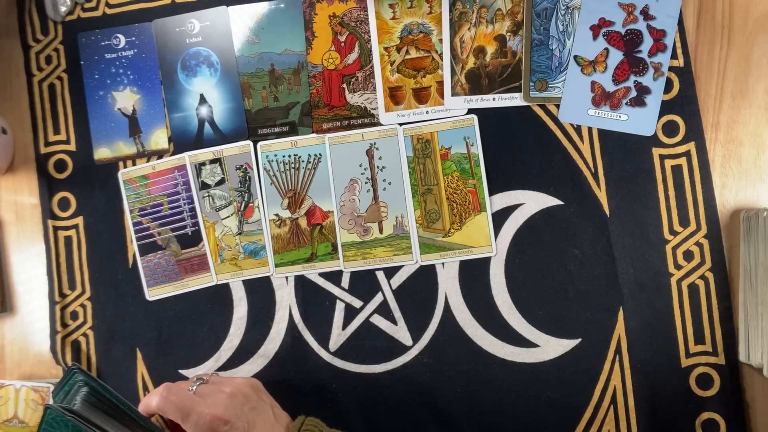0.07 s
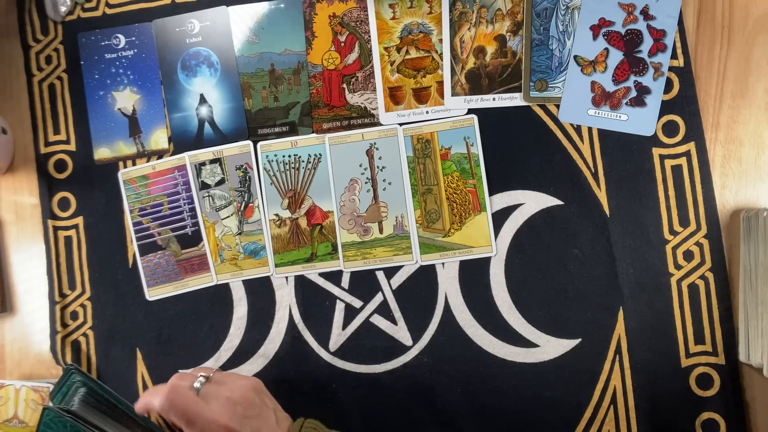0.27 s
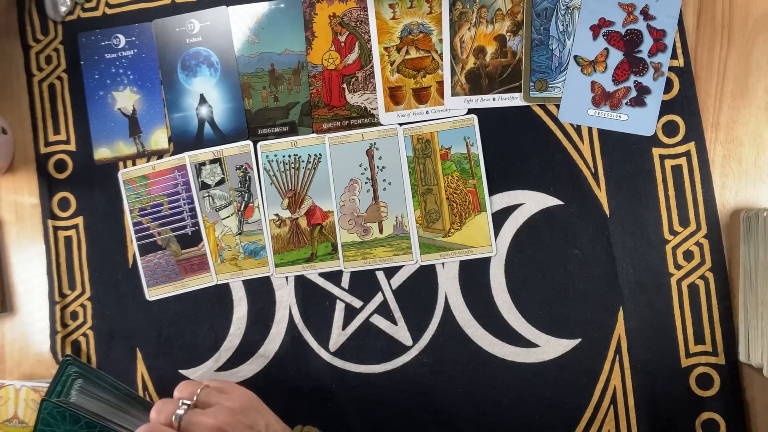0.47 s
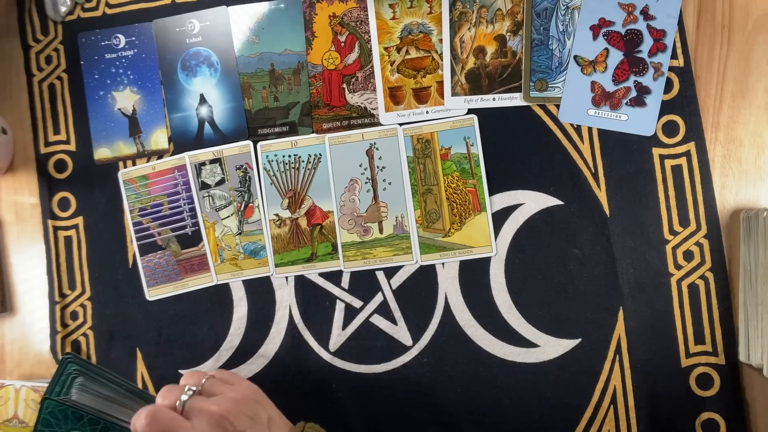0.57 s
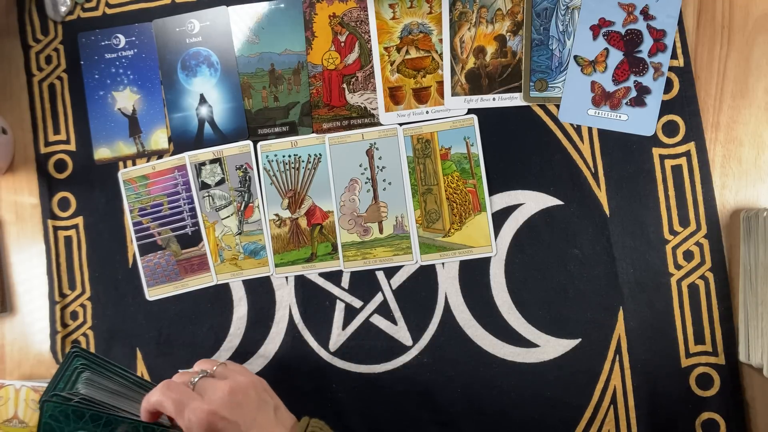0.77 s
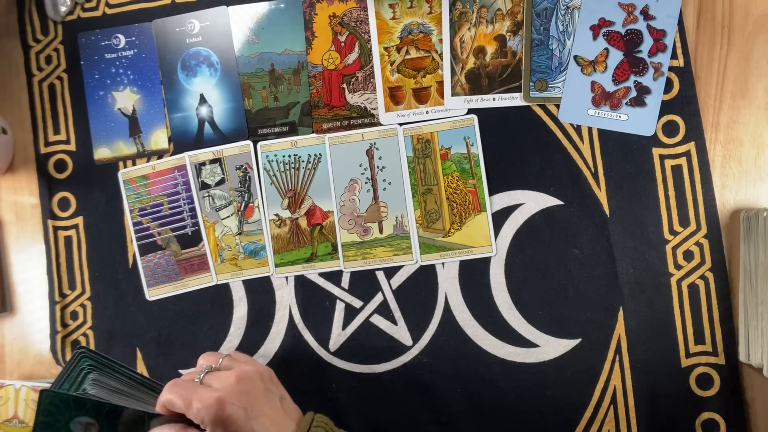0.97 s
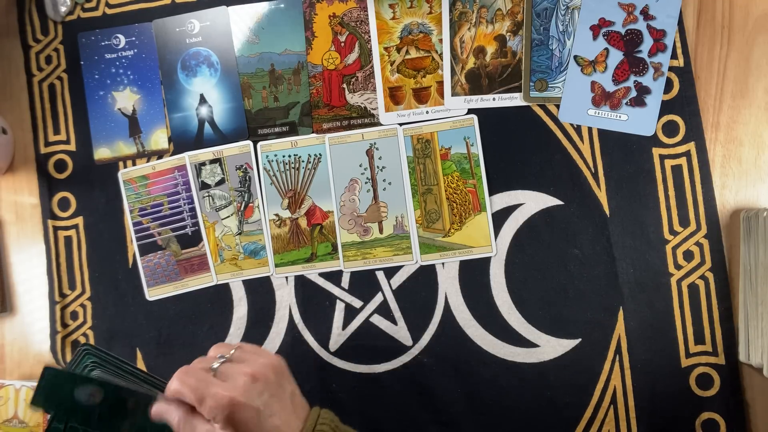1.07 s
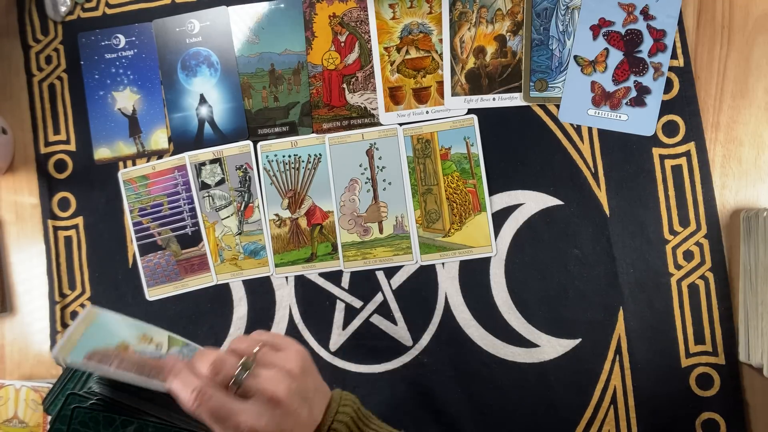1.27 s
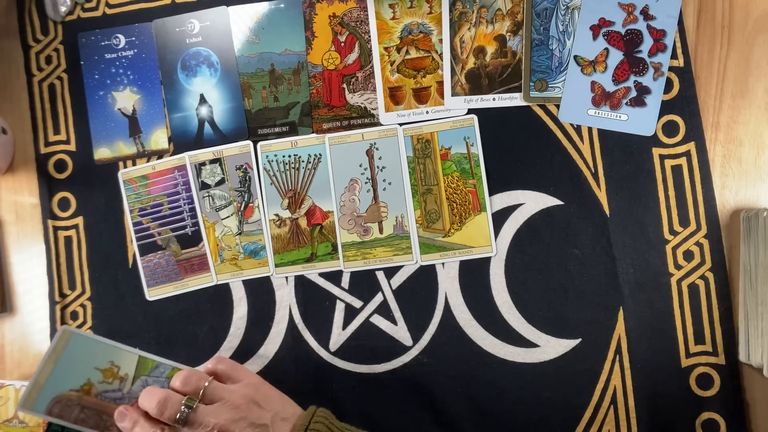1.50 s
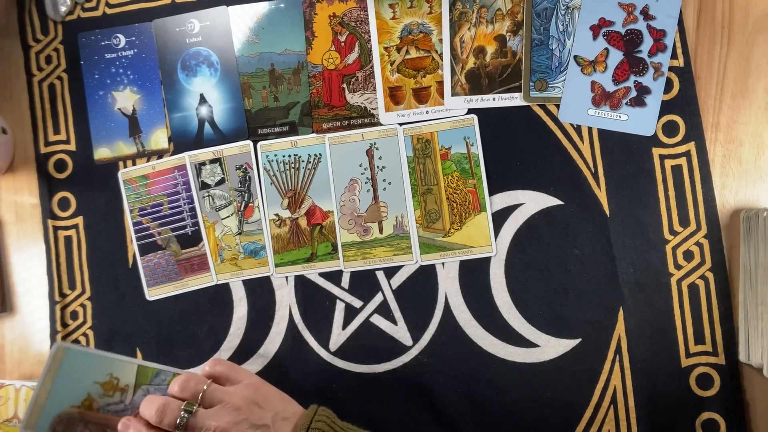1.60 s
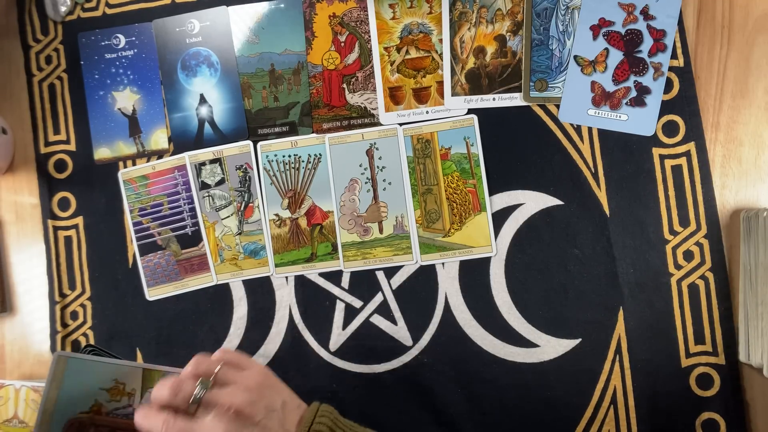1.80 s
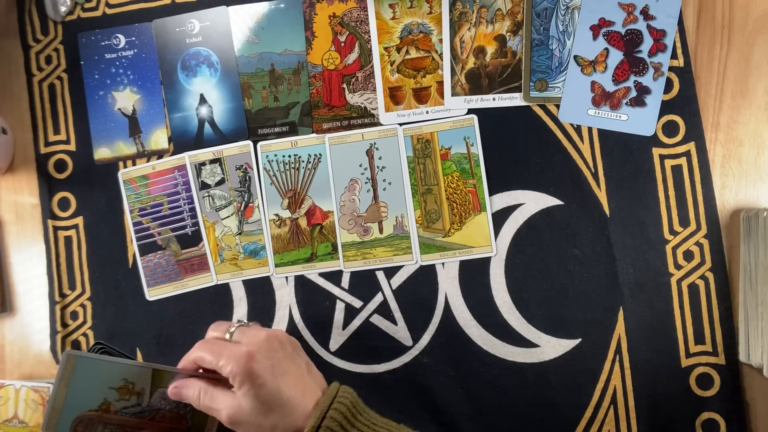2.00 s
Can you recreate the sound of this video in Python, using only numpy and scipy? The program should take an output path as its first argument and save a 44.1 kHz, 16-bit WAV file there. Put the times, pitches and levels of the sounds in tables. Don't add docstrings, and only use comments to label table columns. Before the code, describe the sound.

A card slides softly from a deck and snaps free with one loud, crisp crack, followed by two much quieter clicks. Faint handling rustle and sleeve rubbing continue in a small room, captured fairly close.

```python
import sys
import numpy as np
from scipy import signal
from scipy.io import wavfile
from scipy.ndimage import uniform_filter1d

SR = 44100
rng = np.random.default_rng(int(sys.argv[2]) if len(sys.argv) > 2 else 0)


def gain_from_decibels(decibels):
    exponent = np.asarray(decibels, float) / 20
    return 10 ** exponent


def unload_wav(signal):
    wavfile.write(
        sys.argv[1],
        SR,
        np.round(np.clip(np.atleast_2d(signal).T, -1, 1) * 32767).astype(np.int16),
    )


N = 90316


def unit(x):
    return x / np.sqrt(np.mean(x ** 2))


def band(x, hz, width):
    return signal.lfilter(*signal.iirpeak(min(hz, .45 * SR), hz / width, fs=SR), x)


def ring(hz, t60, size=6000):
    t = np.arange(size) / SR
    return np.sin(2 * np.pi * hz * t) * np.exp(-np.log(1000) * t / t60)


def walk(rate):
    k = int(SR / rate)
    steps = np.repeat(rng.standard_normal(N // k + 1), k)
    return 3.14 * uniform_filter1d(uniform_filter1d(steps, k), k)[:N]


def contacts(rows, way, deck_db, tick_cycles, crack_db):
    # pitch in Hz, level in dB, fade time (t60) in seconds.
    deck_modes = [(270, -12, .05), (390, -10, .06), (550, -9, .07), (730, -12, .05), (883, -8, .09),
                  (1170, -17, .07), (1430, -12, .04), (1590, -13, .05), (1735, -13, .06), (1895, -16, .035),
                  (3000, -10, .025), (3950, -10, .025), (4130, -9, .03), (6700, -10, .008)]
    size = 6000
    flex_cycles, onset_cycles = 12.4, 0.18
    reach_oct, edge_deck_db = 0.45, -15
    crack_s = .004
    t = np.arange(size) / SR
    out = np.zeros(N + size)

    def deck(near_hz, uneven):
        total = 0
        for (hz, db, t60), g in zip(deck_modes, uneven):
            nearness = np.exp(-(np.log2(hz / near_hz) / reach_oct) ** 2)
            total = total + gain_from_decibels(db + 2 * g) * ring(hz, t60) * nearness
        return total

    for s, flex_db, flex_hz, tick_db, tick_hz in rows:
        uneven = rng.standard_normal(len(deck_modes))
        onset = 1 - np.exp(-(t * flex_hz / onset_cycles) ** 2)
        flex = onset * (ring(flex_hz, flex_cycles / flex_hz) + gain_from_decibels(deck_db) * deck(flex_hz, uneven))
        noise = band(band(rng.standard_normal(size), tick_hz, tick_hz), tick_hz, tick_hz)
        crack = noise * np.exp(-t / crack_s * 3) * 2
        tick = ring(tick_hz, tick_cycles / tick_hz) + gain_from_decibels(crack_db) * crack
        tick = tick + gain_from_decibels(edge_deck_db) * deck(tick_hz, uneven)
        sound = gain_from_decibels(flex_db) * flex + gain_from_decibels(tick_db) * tick
        i = int(s * SR)
        out[i:i + size] += way * sound[:len(out) - i]
    return out[:N]


def snap():
    # start in seconds, flex level in dB, flex pitch in Hz, tick level in dB, tick pitch in Hz.
    release = [(1.1288, -40, 650, -28.5, 4630), (1.1342, -46, 1720, -22, 4880),
               (1.1355, -41, 600, -25, 4300), (1.1393, -33, 1160, -27, 6000),
               (1.1408, -45.5, 1800, -36.5, 4500), (1.1445, -40.5, 890, -30, 4000),
               (1.1470, -38, 600, -30.5, 3330), (1.1501, -19.5, 1070, -22.5, 8500),
               (1.1501, -10, 1680, -16, 4000), (1.1618, -21.5, 1640, -24.5, 3520),
               (1.1665, -30.5, 800, -28, 3300), (1.1690, -33, 1750, -56, 3300),
               (1.1715, -32, 765, -53, 3780)]
    # seconds, flex dB, flex Hz, tick dB, tick Hz.
    rebounds = [
        (1.1515, -22, 1500, -14.5, 3320),
        (1.1530, -20.5, 610, -20.5, 3200),
        (1.1531, -16, 1140, -22, 8500),
        (1.1541, -23.5, 1800, -19, 5530),
        (1.1548, -14.5, 1510, -23.5, 3700),
        (1.1566, -15.5, 1770, -26, 3200),
        (1.1578, -20.5, 1980, -35, 3320),
    ]
    return contacts(release, 0.8, -12, 3.2, -9) + contacts(rebounds, -0.9, -12, 3.2, -9)


def clicks():
    # start in seconds, flex level in dB, flex pitch in Hz, tick level in dB, tick pitch in Hz.
    card_clicks = [(1.3484, -48, 286, -29.5, 4940), (1.3486, -74, 750, -29.5, 7140),
                   (1.3484, -56, 480, -35.5, 12200), (1.3494, -29, 1400, -52, 3380),
                   (1.3535, -40, 710, -49, 2930), (1.3535, -52, 514, -45, 4120),
                   (1.4428, -66, 1150, -41, 5000), (1.4665, -25.5, 1905, -31.5, 4980),
                   (1.4665, -61, 1320, -26.5, 6200), (1.4665, -72, 1320, -31, 9400),
                   (1.4674, -58, 1320, -29.5, 2960), (1.4690, -32, 1930, -34, 3900),
                   (1.4712, -46, 1120, -36, 4640), (1.4785, -40, 1220, -43, 4100)]
    return contacts(card_clicks, 0.84, -18, 13, -13)


def touches():
    # start in seconds, flex level in dB, flex pitch in Hz, tick level in dB, tick pitch in Hz.
    light_touches = [(.3475, -59, 1100, -56, 1650), (.3515, -62, 1100, -57, 1650),
                     (.355, -62, 850, -62, 3200), (.378, -64, 1600, -60, 6200),
                     (.3845, -68, 1500, -59, 4600), (.3965, -63, 1500, -57, 6000),
                     (.3985, -72, 1500, -59, 3900), (.4085, -72, 1500, -58, 5500),
                     (.417, -72, 1500, -61, 6800), (.427, -62, 1330, -60, 4000),
                     (.447, -72, 1400, -60, 4700), (.484, -63, 780, -59, 1600),
                     (.4845, -66, 400, -62, 4200), (.620, -62, 1150, -68, 2000),
                     (.805, -63, 1000, -74, 4000), (.890, -63, 1240, -66, 3100),
                     (.902, -63, 1410, -66, 4150), (.9560, -59, 1150, -70, 2800),
                     (.9572, -55, 1850, -64, 2900), (.9605, -63, 1200, -70, 2900),
                     (.9618, -62, 1700, -57, 2900), (.963, -62, 1900, -59, 4200),
                     (1.407, -62, 1200, -62, 4500), (1.7725, -68, 800, -60, 4640),
                     (1.80, -70, 1500, -60, 3050), (1.829, -61, 600, -60, 2900),
                     (1.8803, -51, 1450, -52, 4900), (1.8848, -54, 1500, -60, 3200),
                     (1.8872, -58, 1100, -62, 3300), (1.890, -59, 1300, -64, 3000),
                     (1.893, -55, 1700, -57, 7000), (1.930, -64, 1490, -72, 3100),
                     (1.977, -65, 1500, -74, 3100), (1.9987, -61, 550, -64, 1410)]
    return contacts(light_touches, 1, -18, 6, -9)


def rub(colour, grain_db, patchy_db):
    grains = rng.standard_normal(N) * gain_from_decibels(grain_db * rng.exponential(size=N))
    total = 0
    for hz, width, db in colour:
        total = total + gain_from_decibels(db + patchy_db * walk(60.12)) * unit(band(grains, hz, width))
    return unit(total)


def strokes(t, rows, colour):
    effort = 0
    for s, rise, hold, fall, db in rows:
        speed = np.interp(t, np.cumsum([s, rise, hold, fall]), [0, 1, 1, 0])
        effort = effort + gain_from_decibels(db) * speed ** 2
    return effort * rub(colour, 3, 1.6)


def paper_slides(t):
    # start, rise, hold and fall in seconds, level in dB.
    slide_times = [
        (0.759, 0.015, 0.049, 0.025, -82),
        (0.958, 0.18, 0.034, 0.021, -52.5),
        (1.36, 0.016, 0.056, .03, -72.5),
        (1.462, 0.01, 0.018, 0.098, -68.5),
        (1.491, 0.12, 0.03, 0.043, -61.5),
        (1.766, 0.064, 0.014, 0.091, -66.5),
    ]
    # pitch in Hz, width in Hz, level in dB.
    paper = [(600, 540, -10.5), (1500, 780, -1), (2040, 160, -1.5), (3000, 420, 6), (4000, 1200, 5),
             (6200, 1300, 4), (8500, 1600, -32.5)]
    return strokes(t, slide_times, paper)


def finger_flicks(t):
    # start, rise, hold and fall in seconds, level in dB.
    flick_times = [
        (0.257, 0.0067, 0.0082, .015, -71),
        (0.483, 0.002, 0.004, 0.008, -75),
        (0.885, 0.006, 0.015, 0.012, -72),
        (1.0, 0.14, 0.01, .012, -62),
        (1.604, 0.025, 0.024, .02, -78),
        (1.80, 0.03, 0.0071, 0.03, -72),
        (1.879, 0.002, 0.012, .005, -66),
    ]
    # pitch in Hz, width in Hz, level in dB.
    skin = [(1400, 350, -4.5), (4500, 2500, -2.5), (8500, 3400, 6), (13100, 5000, -16.5)]
    return strokes(t, flick_times, skin)


def edge_ruffles(t):
    # start, rise, hold and fall in seconds, level in dB.
    ruffle_times = [
        (0.353, 0.0091, 0.055, .015, -73),
        (.565, 0.013, 0.037, 0.026, -79),
    ]
    # pitch in Hz, width in Hz, level in dB.
    card_edges = [(1500, 500, 0), (4440, 1200, 0.5), (6200, 1200, 1)]
    return strokes(t, ruffle_times, card_edges)


def sleeve(t):
    # time in seconds, level in dB.
    drag = [(0, -87.5), (.33, -85), (.40, -77), (.7, -83.5), (.95, -76.5), (1.1, -69), (1.4, -71),
            (1.7, -78), (1.8, -69.5), (1.92, -72), (2.05, -72.5)]
    # pitch in Hz, width in Hz, level in dB.
    cloth = [(540, 400, -3), (1450, 500, 2)]
    return gain_from_decibels(np.interp(t, *np.array(drag).T)) * rub(cloth, 1.1, .8)


def thumps(t):
    # start in seconds, level in dB, length in seconds.
    pushes = [
        (1.1497, -30, .0035),
        (1.3485, -54, .004),
        (1.889, -52, .007),
    ]
    total = 0
    for s, db, length in pushes:
        age = np.clip(t - s, 0, None) / length
        total = total + gain_from_decibels(db) * 3 * age * (2 - age) * np.exp(-1.5 * age)
    return total


def room():
    split_hz, cloth_top_hz = 1600, 4400
    t = np.arange(SR // 2) / SR

    def echo(delay_s):
        return np.sinc((t - delay_s) * SR)

    def tail(kind, t60):
        split = signal.butter(2, split_hz, kind, fs=SR, output="sos")
        noise = signal.sosfilt(split, rng.standard_normal(len(t)))
        noise = noise * np.exp(-np.log(1000) * t / t60) * np.clip(t / 0.0012, 0, 1)
        return noise / np.sqrt(np.sum(noise ** 2))

    bounces = gain_from_decibels(-7.5) * echo(.00021) + gain_from_decibels(-19) * echo(.0121)
    bounces = signal.filtfilt(*signal.butter(1, cloth_top_hz, fs=SR), bounces)
    lows = gain_from_decibels(-11.5) * tail("low", 0.33) * np.sqrt(split_hz / SR * 2)
    highs = gain_from_decibels(-17) * tail("high", 0.38)
    return echo(0) + bounces + lows + highs


def drone(t):
    # time in seconds, level in dB.
    swell = [(0, -74), (.1, -68), (.2, -62), (.27, -66), (.33, -80), (.46, -74), (.56, -84), (1.3, -86),
             (1.42, -73), (1.75, -79), (1.85, -86), (2.05, -88)]
    # pitch in Hz, width in Hz, level in dB.
    motor = [(148, 13, 0), (174, 14, -2), (232, 10, -10), (345.6, 90, -14)]
    far = 0
    for hz, width, db in motor:
        noise = band(band(rng.standard_normal(N), hz, width), hz, 2 * width)
        far = far + gain_from_decibels(db) * unit(noise)
    return gain_from_decibels(np.interp(t, *np.array(swell).T)) * unit(far)


def hum(t):
    # pitch in Hz, level in dB.
    tones = [(179, -80), (301, -92)]
    # time in seconds, level in dB.
    fade = [(0, -3.5), (.7, 7), (1.0, -4.5), (2.05, -9.5)]
    total = 0
    for hz, db in tones:
        cycles = hz * np.cumsum(1 + 0.0053 * walk(13)) / SR
        total = total + gain_from_decibels(db + 0.5 + 1.4 * walk(4.44)) * np.sin(2 * np.pi * cycles)
    return gain_from_decibels(np.interp(t, *np.array(fade).T)) * total


def air():
    # pitch in Hz, level in dB per Hz.
    spectrum = [(20, -1), (40, -15), (70, -23), (120, -20.5), (300, -33.5), (600, -35.5), (1760, -49),
                (16000, -54.5)]
    out, table = 0, np.array(spectrum)
    for hz in 20 * 2 ** np.arange(0, 9.8, .5):
        db = np.interp(np.log(hz), np.log(table[:, 0]), table[:, 1]) + 10 * np.log10(hz)
        flicker = 2 * walk(5.86) / (1 + hz / 1500)
        noise = band(band(rng.standard_normal(N), hz, hz / 2), hz, hz / 2)
        out = out + gain_from_decibels(db + flicker) * unit(noise)
    hiss_top = signal.ellip(8, .2, 40, 15850, fs=SR, output="sos")
    return gain_from_decibels(-64) * unit(signal.sosfilt(hiss_top, out))


def scene():
    t = np.arange(N) / SR
    hands = snap() + clicks() + touches()
    hands = hands + paper_slides(t) + finger_flicks(t) + edge_ruffles(t) + sleeve(t)
    hands = signal.sosfilt(signal.butter(1, 6700, fs=SR, output="sos"), hands)
    in_room = signal.fftconvolve(hands, room())[:N] / 1.31
    return (in_room + thumps(t) + drone(t) + hum(t) + air())[None]


def roll_off(x):
    return signal.sosfilt(signal.butter(12, 16480, fs=SR, output="sos"), x)


def record(dry):
    return roll_off(dry)


dry = scene()
out = record(dry)
unload_wav(out)
```